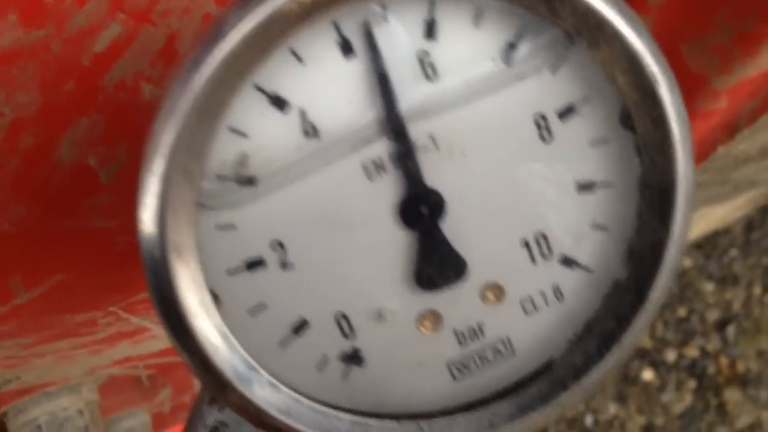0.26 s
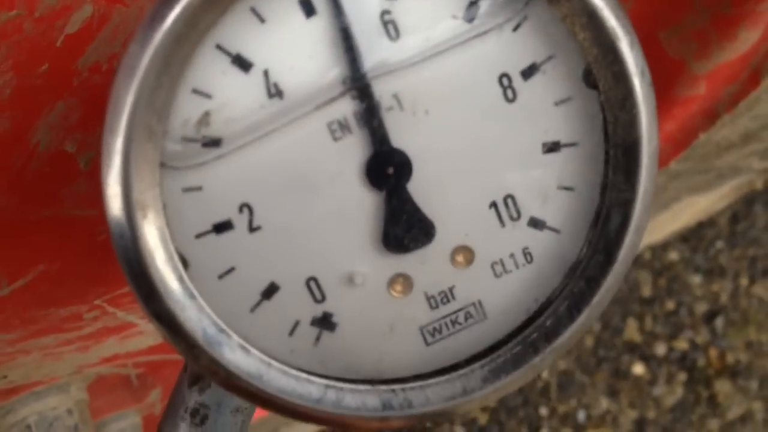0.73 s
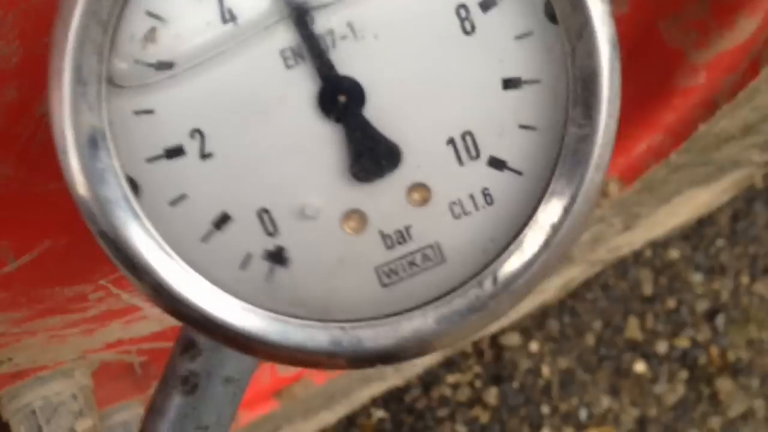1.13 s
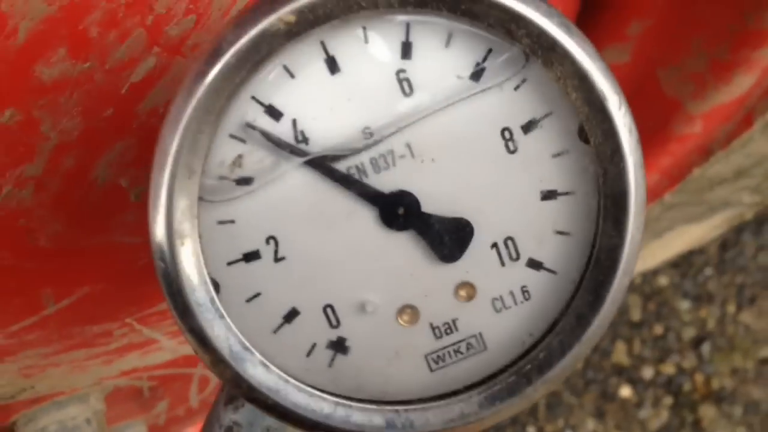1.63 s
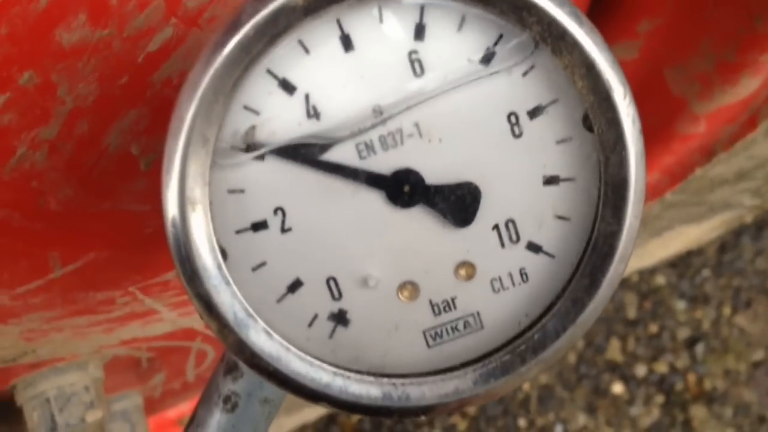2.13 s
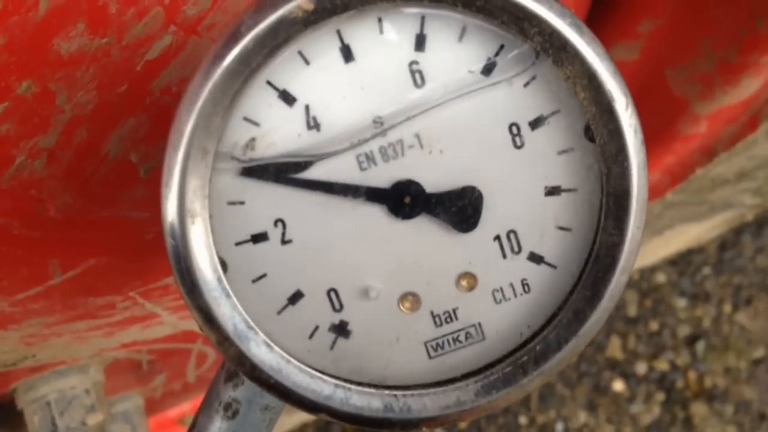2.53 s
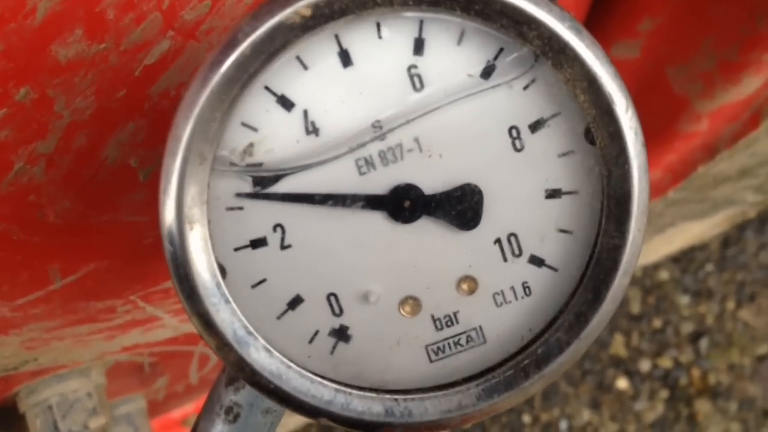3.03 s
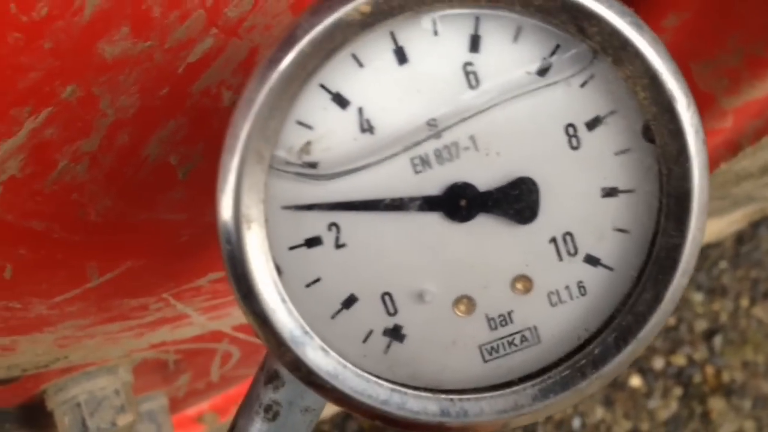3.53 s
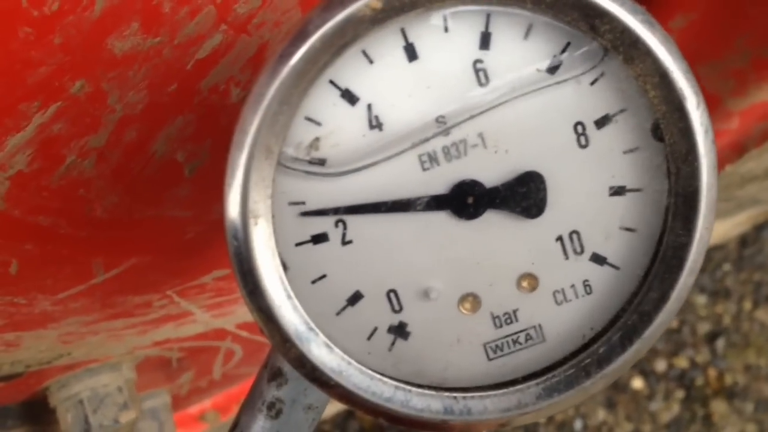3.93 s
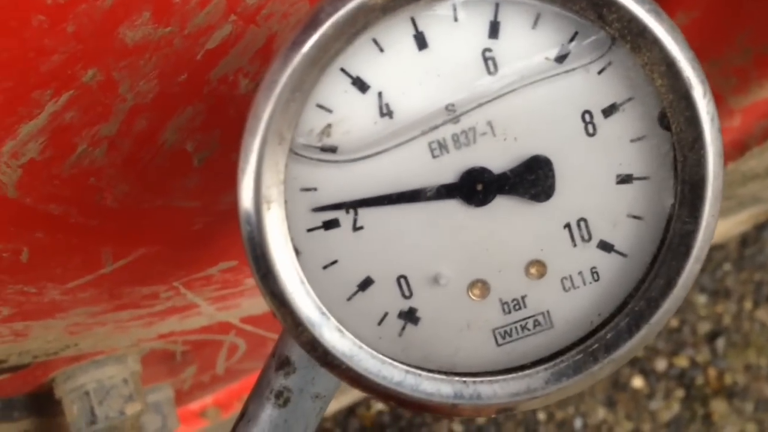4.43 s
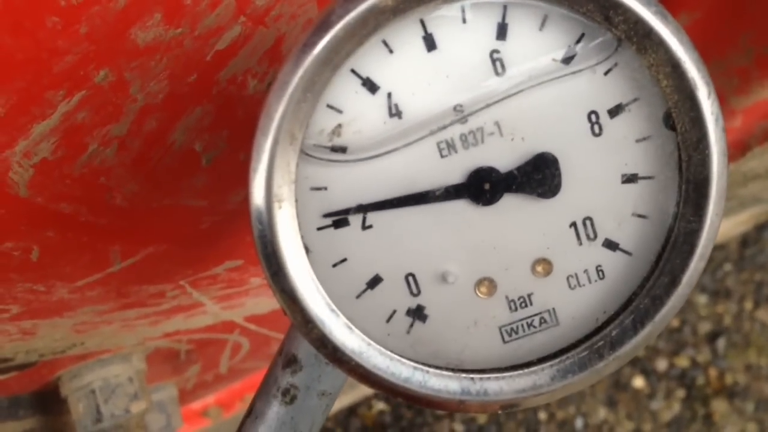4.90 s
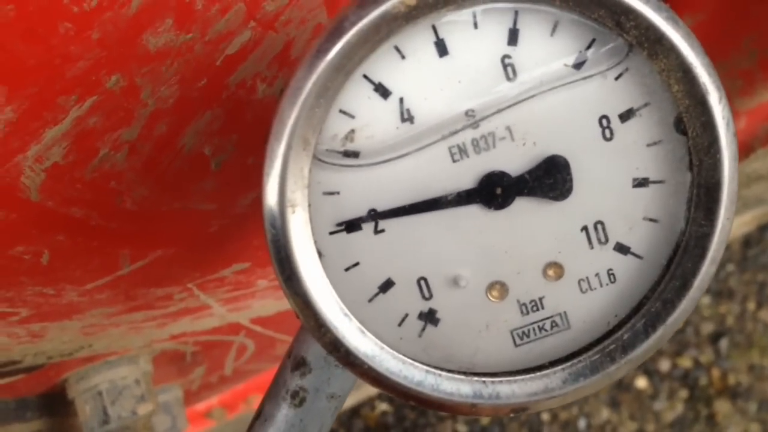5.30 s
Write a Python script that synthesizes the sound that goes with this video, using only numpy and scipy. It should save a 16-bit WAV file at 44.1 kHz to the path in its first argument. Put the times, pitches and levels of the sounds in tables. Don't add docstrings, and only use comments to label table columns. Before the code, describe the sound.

Loud bright air hiss stops abruptly after a second with a dull thump, leaving a short metallic reverberation, faint clicks and sparse bird chirps.

```python
import sys
import numpy as np
from scipy import signal
from scipy.fft import rfft, irfft
from scipy.io import wavfile
from scipy.ndimage import uniform_filter1d

SR = 44100
rng = np.random.default_rng(int(sys.argv[2]) if len(sys.argv) > 2 else 0)


def master_out(mix):
    frames = np.transpose(np.atleast_2d(mix))
    ceiling = np.clip(frames, -1, 1)
    pcm = np.round(ceiling * 32767).astype(np.int16)
    wavfile.write(sys.argv[1], SR, pcm)


def gain_from_db(level_db):
    decades = np.asarray(level_db, float) / 20
    return 10 ** decades


N = 245182
T = np.arange(N) / SR
BINS_HZ = np.fft.rfftfreq(N, 1 / SR)

# frequency_hz, density_db
HISS_SPECTRUM = [(150, -68), (250, -14), (297, -5), (440, -13), (579, -13), (1020, -18.5), (2440, -21),
                 (3820, -17.5), (5110, -19.5), (15000, -22)]
HISS_DB = -63.5

# frequency_hz, density_db
ENGINE_SPECTRUM = [(12, -63), (20, -12), (43, -9.5), (86, 0.5), (107, -5.5), (136, 2), (154, 0.5),
                   (173, -6.5), (210, -7.5), (266, -16), (300, -17.5), (380, -21.5), (700, -27), (910, -52),
                   (1540, -120)]
FIRING_HZ = 12
ENGINE_DB, ENGINE_FADE_DB_PER_S = -54.5, -1

# frequency_hz, level_db
RUSTLE_SPECTRUM = [(700, -9.5), (1150, -7), (1450, -2.5), (1750, -1), (2200, -1.5), (2700, -5.5),
                   (3600, -10), (5000, -11), (7000, -38)]
# middle_s, rise_db, half_length_s
LEAF_GUSTS = [
    (1.684, 8, 0.16),
    (2.35, 2.5, .2),
    (3.197, 4, .08),
    (4.42, 3, 0.13),
]
RUSTLE_DB, RUSTLE_FADE_DB_PER_S = -69, -0.9

# start_s, peak_db, pitch_hz, t60_s, snap_db
HOSE_TICKS = [(1.445, -52.5, 1320, .054, -14), (1.499, -54, 4500, .008, 2), (1.669, -37, 710, .0055, -15),
              (1.712, -31.5, 393, .0076, -20), (1.7569, -48, 1760, .0098, -4),
              (1.7633, -43, 3130, .008, -10), (1.7635, -41, 1900, .012, -3),
              (1.7704, -40.5, 480, .022, -25), (2.1755, -46, 3400, .011, -6), (2.1762, -45, 1700, .01, -4),
              (2.263, -50, 2100, .012, -8), (2.3053, -43.5, 1210, .021, -16),
              (2.3055, -44.5, 750, .018, -16), (2.3061, -35, 1930, .012, -13),
              (2.307, -40, 427, .0063, -25), (2.352, -52, 1190, .019, -4), (3.022, -58, 3500, .012, 0),
              (4.512, -57, 2100, .044, -7), (4.645, -58, 2050, .013, -9)]
# start_s, peak_db, pitch_hz, t60_s, snap_db
LOW_KNOCKS = [
    (1.088, -32.5, 98, 0.079, -40),
    (1.089, -38.5, 192, 0.085, -40),
    (1.452, -45, 92.2, 0.2, -40),
    (1.775, -43, 176, 0.065, -38),
    (2.432, -48, 81, 0.11, -42),
]

# start_s, peak_db, start_pitch_hz
NEAR_CHIPS = [(1.227, -42, 5810), (1.4415, -49.5, 5780), (1.765, -45, 6120), (2.01, -43.5, 5900),
              (2.2, -50, 5980), (2.3485, -47.5, 6000), (2.482, -50.5, 6070), (2.621, -54, 5870),
              (2.778, -53, 5950), (3.077, -52, 5990), (3.802, -44.5, 5840), (3.997, -45.5, 5960),
              (4.5515, -44.5, 5910), (4.747, -44.5, 5860), (4.9583, -48.5, 5890)]
# start_s, peak_db, start_pitch_hz, length_s, echo_db
DISTANT_CHIPS = [
    (4.075, -65, 3950, .075, -8),
]
# start_s, peak_db, pitch_hz, length_s
SECOND_BIRD_PEEPS = [
    (3.028, -63, 5100, .03),
    (3.278, -64.5, 4900, .024),
    (4.53, -62, 5050, .016),
    (4.885, -64, 5050, .036),
    (5.205, -65.5, 5050, .026),
]
# multiple_of_fold_rate, level_db
PARTIALS = [(0.999, -21), (1.998, -3.5), (2.449, -24), (3, -26)]
# delay_s, level_db
WALL_ECHOES = [
    (.031, -8),
    (.071, -15),
]
CHIP_S = 0.025
PITCH_SAG, PITCH_PLUNGE = 0.24, 0.17
CHIP_TAIL_DB, SCATTER_DB = -16.5, -14.5
ECHO_DB, ECHO_MOST_DB = -61.5, -7

# frequency_hz, density_db
JET_SPECTRUM = [(180, -53), (300, -25), (475, -21), (578, -18), (1060, -20), (1190, -17), (1400, -21.5),
                (1620, -10.5), (2440, -7.5), (2830, -9.5), (3740, -4), (4400, -5.5), (6850, -15),
                (13600, -17.5), (15000, -20)]
STEEL_MODES_HZ = [590, 1195, 1575, 1672, 1711, 1862, 2048, 2185, 2296, 2423, 2601, 3003, 3151, 3300, 3434,
                  3572, 3653, 3682, 3749, 3861, 4103, 4176, 4468, 4758, 4867, 5347, 5609, 5848]
# width_hz, over_rush_db
STEEL_MODES = [(60, 2), (15, 4.5), (17.9, 10.5), (14, 7.5), (14, 10.5), (20, 5), (15.9, 8.5), (40, 8),
               (25, -8), (20.3, 11), (18, 6), (20, -4), (14, 14.5), (18, 10), (20, -1), (20, 3), (19.9, -9),
               (16.1, 15.5), (14, 10), (20, 6.5), (18, 11), (20, 6), (20, -1), (20, 5), (18, 3), (14, 9.5),
               (18.1, 4), (14, 9.5)]
# frequency_hz, t60_s
RING_T60 = [(300, 0.17), (600, 0.15), (1000, 1), (1500, 0.83), (2300, 0.98), (3700, 0.64), (5000, 0.69),
            (7000, 0.49), (14000, 0.25)]
# frequency_hz, re_rush_db
FAR_ECHO = [(700, -27), (1600, -23), (2200, -8), (3000, -18), (4000, -53), (8000, -36)]
# frequency_hz, depth_db
HOSE_RIPPLE = [(500, -2), (700, 6), (1300, 4.5), (1600, 6.5), (3000, -0.3), (5000, -3)]
HOSE_SPACING_HZ = 69.9
SHUT_S, FAR_ECHO_T60_S = 1.085, 1.3
MODE_SHARPNESS = 1.3
FLOW_DB, FLOW_SWELL_DB_PER_S = -29.5, 0.25


def evened(x):
    return x / np.sqrt(np.mean(x ** 2) + 1e-20)


def read(points, hz):
    f, value = np.transpose(points)
    return np.interp(np.log(hz + 1), np.log(f + 1), value)


def noise(gain):
    return evened(irfft(rfft(rng.standard_normal(N)) * gain, N))


def drift(top_hz):
    return noise(BINS_HZ * (BINS_HZ < top_hz) / (BINS_HZ + 0.5) ** 2.1)


def smoothed_twice(x, size):
    return uniform_filter1d(uniform_filter1d(x, size=size), size=size)


def add(mix, s, sound):
    part = mix[round(s * SR):][:len(sound)]
    part += sound[:len(part)]


def self_hiss():
    return gain_from_db(HISS_DB) * noise(gain_from_db(read(HISS_SPECTRUM, BINS_HZ)))


def engine():
    turns = np.cumsum(FIRING_HZ * (1 + 0.15 * drift(1.0))) / SR
    throb_db = 1.14 * np.cos(2 * np.pi * turns) + 0.61 * drift(18.0)
    low_cut = BINS_HZ ** 2 / (BINS_HZ ** 2 + 35.0 ** 2)
    rumble = noise(gain_from_db(read(ENGINE_SPECTRUM, BINS_HZ)) * low_cut)
    level_db = ENGINE_DB + ENGINE_FADE_DB_PER_S * T
    return gain_from_db(level_db) * evened(gain_from_db(throb_db) * rumble)


def rustle():
    stir = drift(25.0)
    flutter_db = 2.0 * evened(stir - uniform_filter1d(stir, size=SR // 3))
    gusts_db = sum(db * np.exp(-((T - s) / half) ** 2) for s, db, half in LEAF_GUSTS)
    level_db = RUSTLE_DB + RUSTLE_FADE_DB_PER_S * (T - T.mean()) + gusts_db
    return gain_from_db(level_db + flutter_db) * noise(gain_from_db(read(RUSTLE_SPECTRUM, BINS_HZ)))


def knocks():
    out = np.zeros(N)
    t = np.arange(SR // 8) / SR
    bright = signal.butter(2, [900.0, 4300.0], "band", fs=SR, output="sos")
    for s, db, hz, t60, snap_db in HOSE_TICKS + LOW_KNOCKS:
        onset = 1 - np.exp(-t * hz * 8.1)
        swing = gain_from_db(-60 * t / t60) * np.sin(2 * np.pi * hz * t) * onset
        burst = gain_from_db(snap_db + 3.5 - 60 * t / 0.024) * rng.standard_normal(len(t))
        snap = signal.sosfilt(bright, burst)
        crisp_edge = gain_from_db(snap_db - 6 - 60 * t / 0.006) * rng.standard_normal(len(t))
        add(out, s, gain_from_db(db) * (swing + snap + crisp_edge))
    return out


def yard(echo_db, draws):
    t = np.arange(len(draws[0])) / SR
    scatter = gain_from_db(SCATTER_DB - 60 * t / 0.045)
    walls = 0.5 * sum(gain_from_db(db - 9 * abs(t - s) / 0.006) for s, db in WALL_ECHOES)
    tail = gain_from_db(-15 - 60 * t / 0.4) * (t > 0.01)
    sparse = draws[0] * (abs(draws[1]) < 0.2)
    taps = sparse * (scatter + gain_from_db(echo_db) * (walls + tail))
    taps[0] = 1
    return taps


def peep(hz, length):
    u = np.arange(0, 1, 1 / (length * SR))
    waver = evened(uniform_filter1d(rng.standard_normal(4096), size=90))[:len(u)]
    turns = np.cumsum(hz * (1 + 0.025 * waver)) / SR
    tones = np.sin(2 * np.pi * turns) + gain_from_db(-8.0) * np.sin(2 * np.pi * 1.3 * turns)
    climb = np.arange(0, 1, 1 / (0.014 * SR))
    scratch_turns = np.cumsum(hz * (0.45 + 0.5 * climb)) / SR
    scratch = gain_from_db(-1.5) * np.sin(2 * np.pi * scratch_turns) * np.hanning(len(climb))
    return np.concatenate([scratch, tones * np.hanning(len(u))])


def chip(start_hz, length, shake):
    u = np.arange(0, 1.3, 1 / (length * SR))
    waver, flutter = evened(smoothed_twice(shake, 26))[:, :len(u)]
    glide = 1 - PITCH_SAG * u - PITCH_PLUNGE * u ** 3 + 0.05 * np.exp(-u / 0.1)
    hoarseness = (0.03 + 0.055 * u ** 2) * waver
    fold_turns = np.cumsum(start_hz / 2 * (glide + hoarseness)) / SR
    voice = sum(gain_from_db(db) * np.sin(2 * np.pi * k * fold_turns) for k, db in PARTIALS)
    envelope = np.minimum(u / 0.11, 1) * np.minimum((1.3 - u) / 0.2, 1)
    fade_db = CHIP_TAIL_DB / (1 + np.exp(-(u - 0.62) / 0.09))
    return voice * envelope * gain_from_db(fade_db + 3.5 * flutter)


def birds():
    out = np.zeros(N)
    calls = [(s, db, hz, CHIP_S, min(ECHO_DB - db, ECHO_MOST_DB)) for s, db, hz in NEAR_CHIPS]
    for s, db, hz, length, echo_db in calls + DISTANT_CHIPS:
        call = chip(hz, length, rng.standard_normal((2, 8192)))
        echoes = yard(echo_db, rng.standard_normal((2, SR // 3)))
        add(out, s, gain_from_db(db) * signal.fftconvolve(call, echoes))
    for s, db, hz, length in SECOND_BIRD_PEEPS:
        echoes = yard(-14.0, rng.standard_normal((2, SR // 3)))
        add(out, s - 0.015, gain_from_db(db) * signal.fftconvolve(peep(hz, length), echoes))
    return out


def driven_steel():
    hz, t, z = signal.stft(noise(gain_from_db(read(JET_SPECTRUM, BINS_HZ))), SR, nperseg=8192, noverlap=6144)
    driven = np.clip(1 - (t - SHUT_S + 0.03) / 0.1, 0.06, 1)
    peaks = np.zeros(len(hz))
    for mode_hz, (width, db) in zip(STEEL_MODES_HZ, STEEL_MODES):
        detuning = 2 * MODE_SHARPNESS * (hz - mode_hz) / width
        peaks += gain_from_db(2 * db) * MODE_SHARPNESS / (1 + detuning ** 2)
    blurred = uniform_filter1d(peaks, size=90)
    ring_power = np.outer(peaks, driven) + np.outer(blurred, 1 - driven)
    hose_db = read(HOSE_RIPPLE, hz) * np.cos(2 * np.pi * hz / HOSE_SPACING_HZ)
    z = z * np.sqrt(1 + ring_power) * gain_from_db(hose_db)[:, None]
    return evened(signal.istft(z, SR, nperseg=8192, noverlap=6144)[1][:N])


def air():
    hz, t, z = signal.stft(driven_steel(), SR, nperseg=256, noverlap=192)
    after = np.maximum(t - SHUT_S, 0)
    jet = 0.13 * gain_from_db(-60 * after / 0.18)
    quick = jet + 1.013 * gain_from_db(-60 * after / read(RING_T60, hz)[:, None])
    slow = gain_from_db(read(FAR_ECHO, hz)[:, None] - 60 * after / FAR_ECHO_T60_S)
    patches = uniform_filter1d(rng.standard_normal(z.shape), size=4, axis=0)
    patches = evened(uniform_filter1d(patches, size=30, axis=1))
    flow_db = FLOW_DB + FLOW_SWELL_DB_PER_S * np.minimum(t, SHUT_S)
    gain = gain_from_db(flow_db + 0.97 * patches - 2.0) * np.hypot(quick, slow)
    return signal.istft(z * gain, SR, nperseg=256, noverlap=192)[1][:N]


def scene():
    mix = engine() + rustle() + knocks() + birds() + air()
    return np.array([mix, mix])


def top_cut(x):
    return signal.sosfilt(signal.butter(12, 15190, fs=SR, output="sos"), x)


def record(dry):
    mix = dry + self_hiss()
    return top_cut(mix)


dry = scene()
out = record(dry)
master_out(out)
```